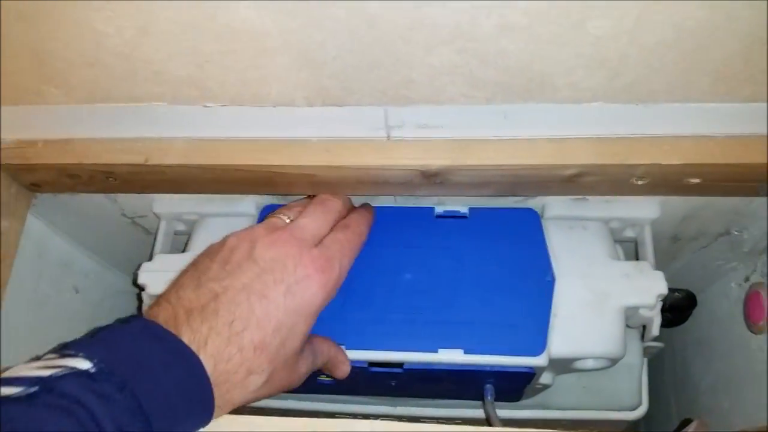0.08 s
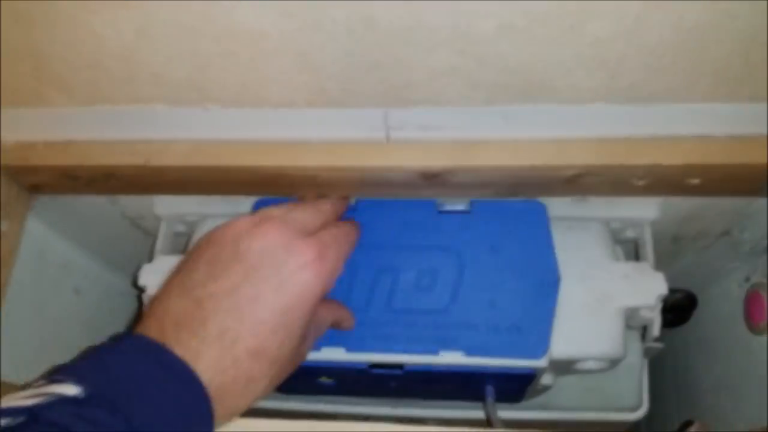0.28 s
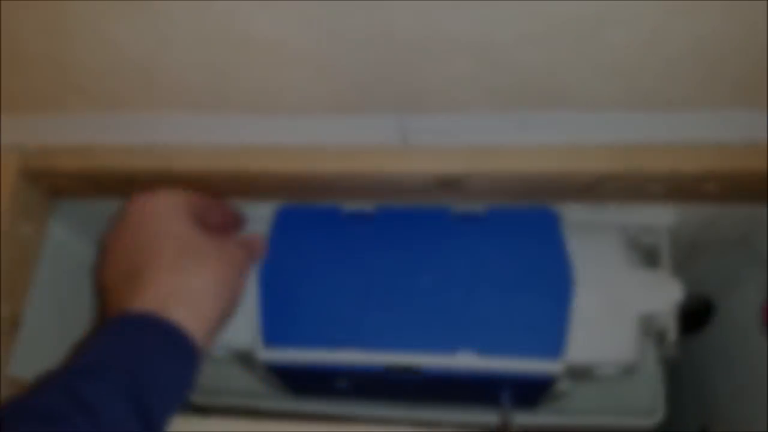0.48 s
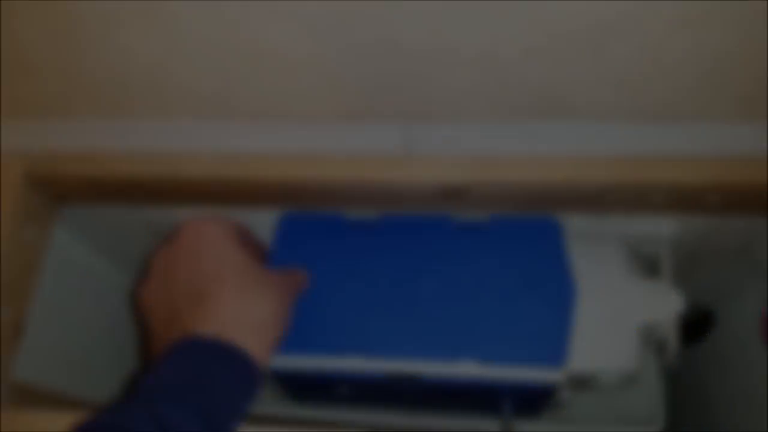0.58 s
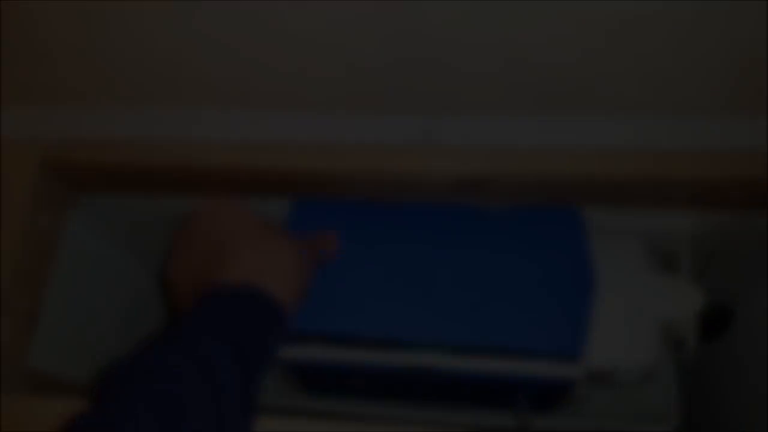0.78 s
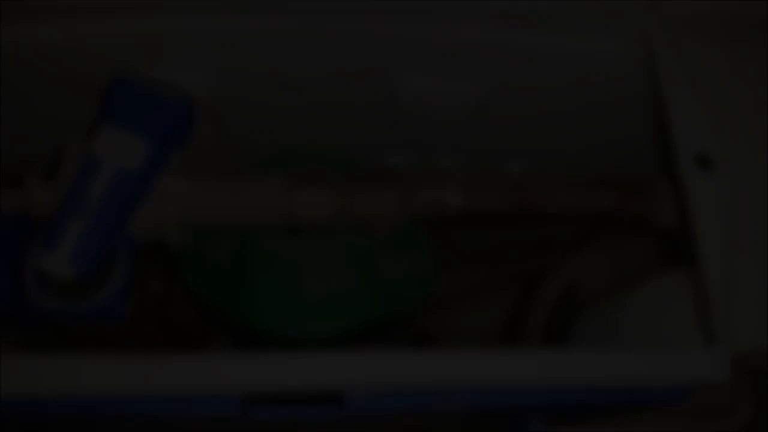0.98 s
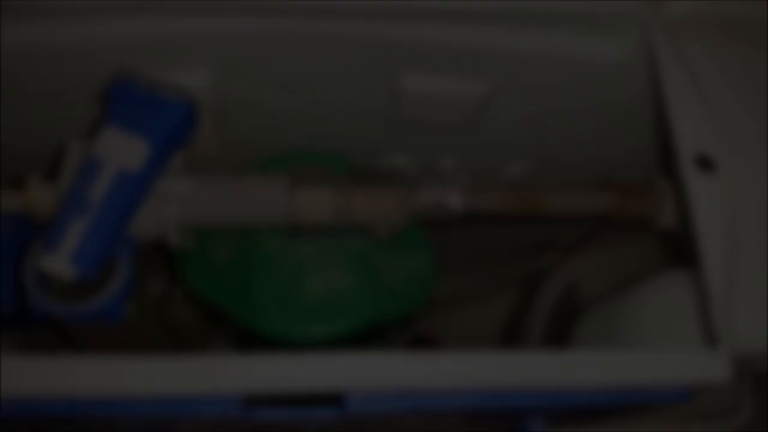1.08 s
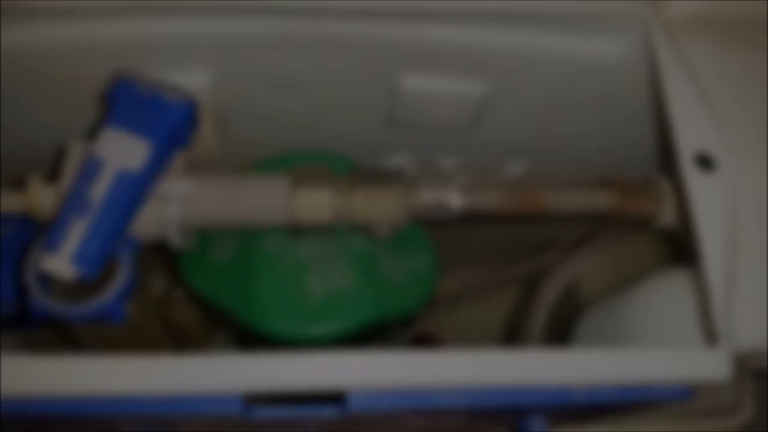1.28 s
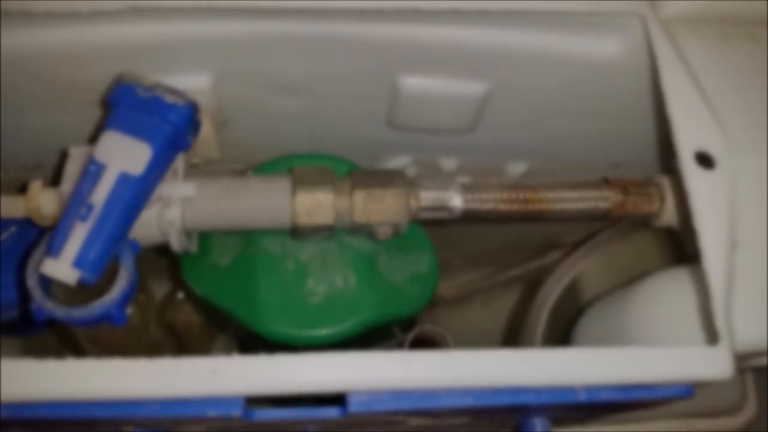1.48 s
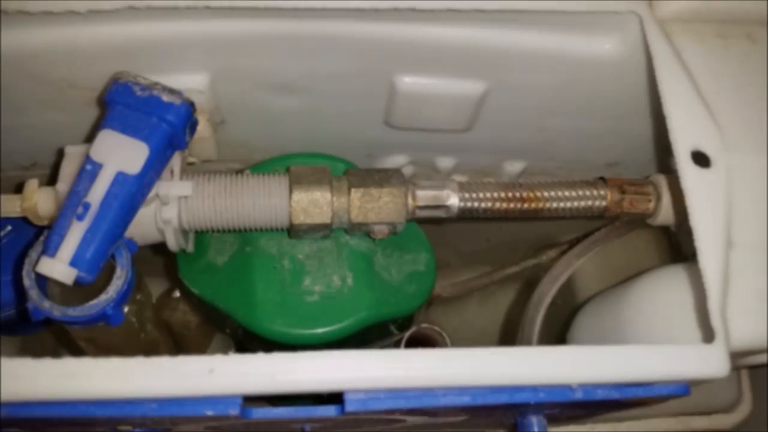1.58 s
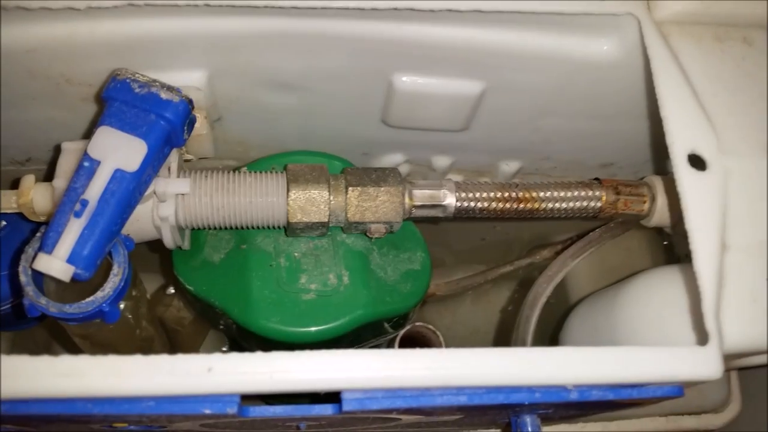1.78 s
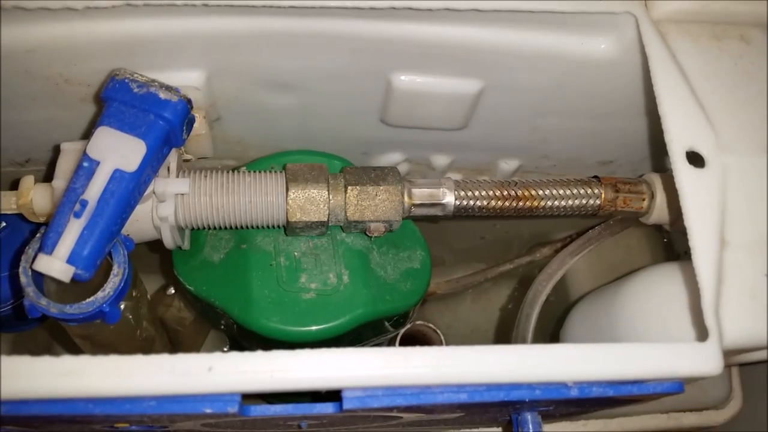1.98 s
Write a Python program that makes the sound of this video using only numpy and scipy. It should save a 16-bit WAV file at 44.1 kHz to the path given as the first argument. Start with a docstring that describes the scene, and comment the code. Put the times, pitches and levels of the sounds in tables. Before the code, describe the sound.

A loose plastic toilet cistern lid knocks and clatters in three hollow bursts, then handling clicks

```python
"""Loose cistern lid in a small bathroom

A hand works a plastic lid loose: each knock is a burst of contacts ringing the hollow tank's modes, plus noise
clatter. Grains of friction ring the damped tank as the lid rubs, and a faint squeak is a narrow band of noise.
Fingers on a handheld camera scratch and slide (shaped noise), tap (dying sines) and bump (slowing swings, one a
low dying sine). A valve hisses faintly and the room rumbles low, both as coloured noise of unsteady level."""
import sys
import numpy as np
from scipy import signal
from scipy.fft import rfft, irfft, next_fast_len
from scipy.io import wavfile
from scipy.ndimage import map_coordinates

SR = 44100
rng = np.random.default_rng(int(sys.argv[2]) if len(sys.argv) > 2 else 0)


def volts(x):
    """Linear amplitude factor 10**(x/20) for a level x in dB, scalar or array-like."""
    e = np.asarray(x, float) / 20
    return 10 ** e


def bounce(signal):
    """Save signal as a 16-bit WAV file at the path given by the first command-line argument."""
    frames = np.transpose(np.atleast_2d(signal))
    limited = np.clip(frames, -1, 1)
    pcm = np.round(limited * 32767).astype(np.int16)
    wavfile.write(sys.argv[1], SR, pcm)


N = 88200  # two seconds

# Faint valve hiss over time. Each row: time in seconds, level in dB.
HISS_LEVEL = [(0, -61), (.2, -62), (.4, -54), (.7, -63.5), (1.05, -50), (1.2, -60), (1.5, -70.5), (2, -69)]
# Bands of the hiss. Each row: frequency in Hz, relative density in dB per Hz.
HISS_COLOUR = [(1200, 2), (2390, -19.5), (3850, -2), (4800, 1.5), (5600, -16.5), (8100, -5), (10500, -19),
               (12500, -31), (14200, -12.5), (15800, -33.5)]
# Low room rumble over time. Each row: time in seconds, level in dB.
RUMBLE_LEVEL = [(0, -52), (.8, -50.5), (1.3, -52.5), (1.63, -50.5), (1.75, -52.5), (2, -61)]
# Spectrum of the rumble. Each row: frequency in Hz, relative density in dB per Hz.
RUMBLE_COLOUR = [(12, -53.5), (30, -11.5), (60, 2), (78, -17.5), (92, -2.5), (305, -12), (470, -22),
                 (1220, -43), (1890, -39.5), (3000, -38), (3900, -89)]

# Skin sliding over the camera shell. Each row: start in seconds, rise in seconds, fall t60 in seconds, level in dB.
SLIDES = [(1.334, 0.011, 0.61, -57.5), (1.423, 0.021, 0.31, -46), (1.552, 0.0038, 0.33, -62)]
# Spectrum of the sliding. Each row: frequency in Hz, relative density in dB per Hz.
SLIDE_COLOUR = [(350, -24.5), (600, 7), (2860, -7), (3970, 0), (5070, -7.5), (8530, -5), (11200, -23),
                (15800, -12)]
# Fingertip taps, plus one low bump on the microphone (the 93.8 Hz row), each a single dying sine. Each row:
# start in seconds, level in dB, left over right in dB, pitch in Hz, cycles to fall 20 dB.
TAPS = [(1.3446, -29, -1, 256, 6), (1.7422, -32, -11.5, 6770, 46), (1.7567, -21.5, -14.5, 93.8, 1.5),
        (1.446, -29, -11, 4720, 8), (1.484, -29.5, -19, 720, 3), (1.567, -42, -2, 1860, 4),
        (1.708, -30, -35, 940, 0.27), (1.774, -15.5, -7.5, 11650, 18), (1.7757, -25.5, 2, 3870, 8),
        (1.78, -29, -9.5, 2000, 4.5), (1.79, -4.5, 9, 1910, 0.5), (1.875, -42, 2.5, 1770, 3)]
# Fingers scratching on the camera. Each row: start in seconds, level in dB before trim,
# treble lift in dB before trim, left over right in dB, t60 of the first fall in seconds.
TICKS = [(1.4442, -25, -41, -1, 0.045), (1.4825, -35.5, -16.5, -23, 0.017), (1.7374, -27.5, 2, -5, 0.073),
         (1.7446, -18.5, -17, -1, 0.0072), (1.7579, -31, -5.5, -18, 0.13),
         (1.7731, -11.5, -15.5, 0.5, 0.0093)]
# Spectrum of the scratches. Each row: frequency in Hz, relative density in dB per Hz.
TICK_COLOUR = [(400, -5), (1320, -9.5), (2150, -4), (2960, -12.5), (3950, -4), (6090, -10.5), (6830, -10),
               (9120, 4), (12000, 3.5), (14100, -16), (15800, -62)]
# Bumps on the microphone ports. Each row: start in seconds, left level in dB, right level in dB,
# first push in seconds.
BUMPS = [(1.14, -43, -34.5, 0.0017), (1.4828, -27, -8, 0.0019), (1.514, -24.5, -43, 0.0024),
         (1.559, -51, -32, 0.0011), (1.747, -54, -38, 0.00094), (1.778, -53.5, -22.5, 0.0013)]

# A finger squeaking on plastic. Each row: centre in seconds, half length in seconds, pitch in Hz,
# width in Hz, level in dB.
SQUEAKS = [(0.394, 0.026, 2380, 200, -60.5)]
# How fast the bathroom dies away. Each row: frequency in Hz, t60 in seconds.
ROOM_T60 = [(200, 0.042), (4000, 0.17)]
# Hand and lid rubbing over time. Each row: time in seconds, level in dB.
RUB_LEVEL = [(0, -45.5), (.2, -45), (.4, -51), (.6, -50.5), (.85, -50.5), (1.08, -54), (1.2, -56.5),
             (1.45, -69)]
# Lid against tank. Each row: start in seconds, level in dB, hardness in dB,
# pitch of the struck spot in Hz, rattle decay (time constant) in seconds.
KNOCKS = [(0.042, -29.5, -44, 322, 0.0028), (.064, -26, -25.5, 419.5, 0.0098),
          (.097, -34.5, -25, 724, 0.0024), (0.1372, -24, -25, 385, 0.012), (.165, -41, -12, 271, 0.0032),
          (0.188, -30, -27, 331, 0.0042), (.226, -25.5, -20, 696, .003), (0.2371, -3.5, -20, 759, 0.016),
          (0.238, -16.5, -19.5, 2634, 0.0033), (0.2466, -4.5, -22.5, 803.7, 0.018),
          (.252, -14, -20.5, 243.6, 0.0051), (.314, -32, -10, 412, 0.0083),
          (.292, -21.5, -25, 233.3, 0.0035), (.427, -36, -11.5, 411, 0.0047), (.448, -6, -14, 457, 0.0019),
          (.46, -12.5, -9, 590, 0.0238), (.467, -8.5, -24, 880, 0.0037), (0.48, -13, -20, 318.6, 0.0064),
          (0.489, -12, -10.5, 250, 0.016), (.51, -9, -12.5, 778, 0.0062), (.515, -10.5, -13.5, 481, 0.0046),
          (0.532, -14, -17, 508, 0.0086), (.555, -17, -28, 276, 0.014), (.63, -19.5, -20.5, 723, 0.012),
          (.6324, -30.5, -9.5, 1290, 0.0048), (0.682, -29.5, -18, 513, 0.005),
          (0.73, -35.5, -19, 737, 0.0049), (0.757, -35, -19, 429, 0.0045), (.764, -30, -20.5, 706, 0.0086),
          (.809, -29, -16, 813, 0.0033), (.824, -23, -19, 511, 0.012), (.831, -24, -26.5, 1320, 0.014),
          (0.858, -27.5, -15.5, 328, 0.016), (.88, -11.5, -16, 650, 0.012),
          (0.893, -13.5, -14.5, 358, 0.0025), (.91, -13.5, -12.5, 2286, 0.0066),
          (.913, -4.5, -18.5, 778, 0.01), (.943, -24.5, -11.5, 696, 0.0023),
          (.976, -10, -19.5, 707, 0.0011), (.983, -9, -13.5, 491, 0.0056), (1.003, -17.5, -27, 375, 0.014),
          (1.161, -25, -35.5, 353, 0.0029), (1.1628, -29, -26, 1305, 0.0012),
          (1.173, -30.5, -46, 257, 0.008), (1.183, -28.5, -52, 434, 0.012), (1.356, -34, -21, 300, .025)]
# Resonances of lid and tank before the grip bends them. Each row: frequency in Hz, relative level in dB,
# t60 in seconds.
TANK_MODES = [(243, -8, .15), (315, -9, .2), (370, -12, .15), (434, -.5, .2), (575, -3, .17),
              (740, -.5, .14), (810, -5, .13), (890, -11, .1), (990, -9, .13), (1040, -10, .12),
              (1255, -9, .15), (1620, -15, .09), (1780, -17, .09), (2020, -18, .08), (2380, -19, .07),
              (2720, -11, .08)]
# Phase of the ring between the sides. Each row: frequency in Hz, lead of the left in radians.
LEFT_LEAD = [(200, 0.15), (800, 0.29), (1400, 0.76), (2700, 1.86)]
# Balance of the ring. Each row: frequency in Hz, left over right in dB.
LEFT_OVER_RIGHT = [(250, 0), (700, -0.3), (1500, 8.5), (2700, -3.5)]
# Spectrum of the clatter at middling hardness. Each row: frequency in Hz, relative density in dB per Hz.
CLATTER_COLOUR = [(530, -14), (900, -15), (1470, -12), (2650, -10), (3250, -19), (4230, -15.5), (6510, -27),
                  (8370, -29), (15800, -45.5)]
# How fast the clatter dies. Each row: frequency in Hz, t60 in seconds.
CLATTER_T60 = [(1000, 0.058), (4000, 0.065), (12000, 0.075)]
# Stereo width of the clatter. Each row: frequency in Hz, left-right correlation.
CLATTER_ALIKE = [(700, -0.58), (1400, 0.2), (7000, -0.018)]

TICK_GRAINS_PER_S, TICK_GRAIN_DB, TICK_TOP_HZ = 600, 2, 7500
TICK_TAIL_DB, TICK_TAIL_T60 = -9.5, 0.24  # slower tail under each scratch, t60 in seconds
BUMP_SLOWS = 0.63  # below 1, each swing is longer than the last
ROOM_DB = -7.5
RUB_GRAINS_PER_S, RUB_SPREAD_DB, RUB_UNEVEN_DB = 350, 2.5, 4
RUB_T60 = 0.0083  # seconds; the hand damps the ring
PULL_SHARE, PULL_OCTAVES = 0.61, 0.15  # the grip bends the nearest modes towards the spot's pitch
SPOT_OCTAVES, SPOT_DB = 0.27, 14  # width and lift of the struck spot's modes
ATTACK_S = 0.0005
BLOW_DB, BLOW_T60 = 1.5, 0.13  # extra ring while the blow spreads, t60 in seconds
RING_DB, CRACK_DB = -2.5, 2  # the crack also follows hardness
SOFT_RING_DB, SOFT_CLATTER_DB = 0.64, 0.43  # treble lost per octave and dB of softness
SNAP_DB, SNAP_T60 = -6.5, 0.0046  # first snap of the clatter, t60 in seconds
RATTLE_SHARE = 0.25  # size of later contacts against the first
TANK_LOW_HZ = 208  # the tank radiates little below
HALVES = np.array([[0.5], [-0.5]])  # splits a left-over-right figure between the sides


def unit(x):
    """Scales a sound to rms 1."""
    return x / np.sqrt(np.mean(x ** 2) + 1e-20)


def along(points, hz):
    """Reads a frequency table at hz, interpolating on a log axis."""
    f, value = np.transpose(points)
    return np.interp(np.log(hz + 1), np.log(f + 1), value)


def curve(rows):
    """Draws a time table as one value per sample."""
    return np.interp(np.arange(N) / SR, *np.transpose(rows))


def wobble(rate):
    """Draws a smooth random curve with rate knots a second."""
    knots = rng.standard_normal(int(N * rate / SR) + 4)
    return map_coordinates(knots, [np.arange(N) * rate / SR])


def filtered(x, response):
    """Shapes a sound's spectrum by a gain that depends on frequency."""
    m = next_fast_len(x.shape[-1] + 4096)
    spectrum = rfft(x, m) * response(np.fft.rfftfreq(m, 1 / SR))
    return irfft(spectrum, m)[..., :x.shape[-1]]


def rush(n, colour, alike):
    """Makes coloured stereo noise of rms 1; the mid/side split sets the left-right correlation."""
    def mid_side_gains(hz):
        turn = np.arccos(np.clip(along(alike, hz), -1, 1)) / 2
        return volts(along(colour, hz)) * [np.cos(turn), np.sin(turn)]

    mid, side = filtered(rng.standard_normal((2, n)), mid_side_gains)
    return unit(np.array([mid + side, mid - side]))


def dying(x, t60s):
    """Lets each frequency of a sound die at its own speed."""
    hz, t, z = signal.stft(x, SR, nperseg=128)
    faded = z * volts(-60 * t / along(t60s, hz)[:, None])
    return signal.istft(faded, SR, nperseg=128)[1][..., :x.shape[-1]]


def place(out, start_s, sound):
    """Mixes a stereo sound into out at its start time."""
    out[:, round(start_s * SR):][:, :sound.shape[1]] += sound


def valve_hiss():
    """Thin valve hiss: noise in narrow bands at a fluttering level."""
    level = volts(curve(HISS_LEVEL) + 0.58 * wobble(15.32))
    return level * rush(N, HISS_COLOUR, [(1500, 0.073), (9000, 0.12)])


def room_rumble():
    """Low rumble: bass-heavy noise of unsteady level, more alike left and right in the deep bass."""
    level = volts(curve(RUMBLE_LEVEL) + 2 * wobble(10.48))
    return level * rush(N, RUMBLE_COLOUR, [(40, 0.73), (300, 0.35), (2000, 0.4)])


def slides():
    """Skin sliding over the shell: noise that swells and dies, cut after a quarter second."""
    out, t = np.zeros((2, N + SR)), np.arange(SR // 4) / SR
    for s, rise_s, t60, db in SLIDES:
        swell = np.minimum(t / rise_s, 1) ** 2
        fall = volts(db - 60 * np.maximum(t - rise_s, 0) / t60)
        place(out, s, swell * fall * rush(len(t), SLIDE_COLOUR, [(1000, 0.1)]))
    return out[:, :N]


def taps():
    """Fingertip taps, and one low bump on the microphone: each is one dying sine."""
    out, t = np.zeros((2, N + SR)), np.arange(SR // 4) / SR
    for s, db, pan_db, hz, cycles in TAPS:
        fall = volts(db + HALVES * pan_db - 20 * hz * t / cycles)
        attack = 1 - np.exp(-2 * hz * t)
        place(out, s, fall * attack * np.sin(2 * np.pi * hz * t))
    return out[:, :N]


def scratches():
    """Fingers scratching the shell: grainy noise with a quick fall and a slower tail."""
    out, t = np.zeros((2, N + SR)), np.arange(SR // 4) / SR
    for s, db, top_db, pan_db, t60 in TICKS:
        noise = rush(len(t), TICK_COLOUR, [(1000, 0.063)])
        noise = filtered(noise, lambda hz: np.where(hz > TICK_TOP_HZ, volts(top_db + 1.5), 1))
        fall = volts(-60 * t / t60) + volts(TICK_TAIL_DB - 60 * t / TICK_TAIL_T60)
        attack = 1 - np.exp(-t / 0.00024)
        grain = volts(TICK_GRAIN_DB * wobble(TICK_GRAINS_PER_S)[:len(t)])
        place(out, s, volts(db - 9.5 + HALVES * pan_db) * noise * fall * attack * grain)
    return out[:, :N]


def bumps():
    """Bumps push the microphone, which swings back ever slower as it settles."""
    out, t = np.zeros((2, N + SR)), np.arange(SR // 4) / SR
    for s, left_db, right_db, push_s in BUMPS:
        u = t / push_s
        envelope = np.e * u ** 1.5 * np.exp(-u)
        swing = np.sin(np.pi * u ** BUMP_SLOWS)
        place(out, s, volts([[left_db], [right_db]]) * envelope * swing)
    return out[:, :N]


def squeak():
    """A finger squeaks on plastic: a narrow band of noise that swells and fades, equal on both sides."""
    out, t = np.zeros(N), np.arange(N) / SR
    for s, half_s, hz, width_hz, db in SQUEAKS:
        band = filtered(rng.standard_normal(N), lambda f: np.exp(-((f - hz) / width_hz) ** 2))
        out += volts(db) * np.exp(-((t - s) / half_s) ** 2) * unit(band)
    return out


def room(x):
    """The bathroom's short answer: a noise tail, delayed 200 samples, whose frequencies die separately."""
    tail = dying(rng.standard_normal((2, SR // 2)), ROOM_T60)
    delayed = np.pad(x, ((0, 0), (200, 0)))
    return signal.fftconvolve(delayed, tail / np.linalg.norm(tail[0]), axes=1)[:, :N]


def tank_ring(spot_hz, scatter_db, dull_db=0):
    """One blow on the tank: dying sine modes, strongest near the struck spot's pitch, at peak 1."""
    hz, db, t60 = np.transpose(TANK_MODES)[:, :, None]
    t = np.arange(SR // 3) / SR
    hz = hz + PULL_SHARE * (spot_hz - hz) * np.exp(-(np.log2(hz / spot_hz) / PULL_OCTAVES) ** 2)
    octaves = np.log2(hz / spot_hz)
    db = db + dull_db * octaves + SPOT_DB * np.exp(-(octaves / SPOT_OCTAVES) ** 2)
    db = db + scatter_db * rng.standard_normal(hz.shape)
    sides = []
    for k in (0.5, -0.5):  # left, right
        level = volts(db + k * along(LEFT_OVER_RIGHT, hz) - 60 * t / t60)
        modes = level * np.sin(2 * np.pi * hz * t + k * along(LEFT_LEAD, hz))
        sides.append(modes.sum(axis=0))
    x = np.array(sides) * (1 - np.exp(-t / ATTACK_S))
    return x / np.abs(x).max()


def lid_rub():
    """The lid rubs: random friction grains of uneven level ring the hand-damped tank."""
    happens = rng.random(N) < RUB_GRAINS_PER_S / SR
    grains = happens * volts(RUB_SPREAD_DB * rng.exponential(size=N)) * rng.choice([-1, 1], N)
    level = volts(curve(RUB_LEVEL) + RUB_UNEVEN_DB * wobble(25))
    level = level * (np.arange(N) < RUB_LEVEL[-1][0] * SR)  # silent after the last row
    body = tank_ring(420, scatter_db=0)
    body = body * volts(-60 * np.arange(body.shape[1]) / SR / RUB_T60)
    friction = (unit(grains) * level)[None]
    return signal.fftconvolve(friction, body / np.linalg.norm(body[0]), axes=1)[:, :N]


def clatter(hard_db, n):
    """Plastic clatter: noise with a first snap, duller for soft contacts, its frequencies dying separately."""
    age = np.arange(n) / SR
    dull_db = SOFT_CLATTER_DB * (hard_db + 16.5)
    colour = [(hz, db + dull_db * np.log2(hz / 3000)) for hz, db in CLATTER_COLOUR]
    snap = (1 + volts(SNAP_DB - 60 * age / SNAP_T60)) * (1 - np.exp(-age / 0.000495))
    noise = dying(rush(n, colour, CLATTER_ALIKE), CLATTER_T60)
    return snap * noise * volts(HALVES * -2.5)  # leans 2.5 dB to the right


def lid_knocks():
    """Each knock is a short rattle of contacts that rings the tank and clatters."""
    out, t = np.zeros((2, N + SR)), np.arange(SR // 40) / SR
    for s, db, hard_db, spot_hz, rattle_s in KNOCKS:
        happens = rng.random(len(t)) < 0.02
        contacts = rng.standard_normal(len(t)) * happens * np.exp(-t / rattle_s) * RATTLE_SHARE
        contacts[0] = 1
        contacts = contacts[None] / np.linalg.norm(contacts)
        body = tank_ring(spot_hz, scatter_db=5.5, dull_db=SOFT_RING_DB * (hard_db + 19))
        age = np.arange(body.shape[1]) / SR
        body = body * (1 + volts(BLOW_DB - 60 * age / BLOW_T60)) / (1 + volts(BLOW_DB))
        crack = clatter(hard_db, body.shape[1])
        blow = volts(RING_DB) * body + volts(CRACK_DB + hard_db) * crack
        place(out, s, volts(db) * signal.fftconvolve(blow, contacts, axes=1))
    return out[:, :N]


def scene():
    """Mixes hiss and rumble, fingers on the camera, the squeak, and the lid in its room."""
    background = valve_hiss() + room_rumble()
    fingers = slides() + taps() + scratches() + bumps()
    low_cut = signal.butter(3, TANK_LOW_HZ, "high", fs=SR, output="sos")
    tank = signal.sosfilt(low_cut, lid_knocks() + lid_rub())
    return background + fingers + squeak() + tank + volts(ROOM_DB) * room(tank)


def low_pass(x):
    """Removes everything above the highest recorded frequency."""
    return signal.sosfilt(signal.butter(12, 16050, fs=SR, output="sos"), x)


def record(dry):
    """Finishes the mix by cutting everything from 16050 Hz up."""
    mix = filtered(dry, lambda hz: hz < 16050)
    return low_pass(mix)


dry = scene()
out = record(dry)
bounce(out)
```